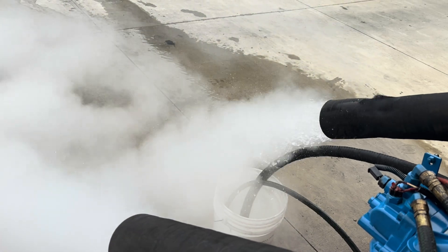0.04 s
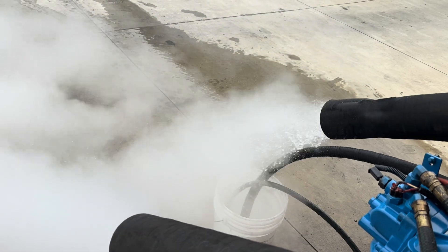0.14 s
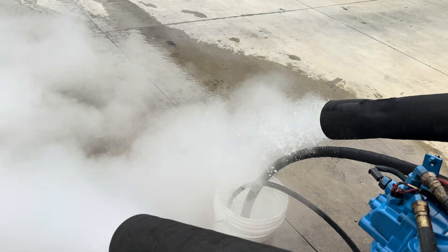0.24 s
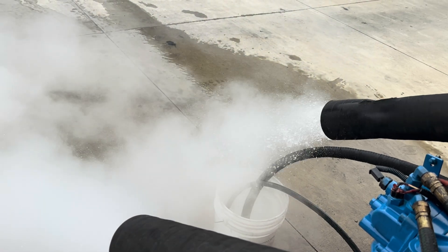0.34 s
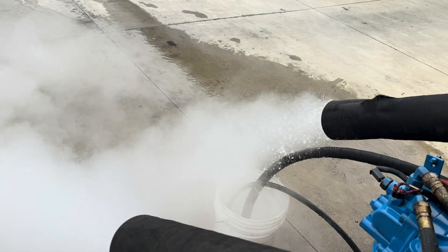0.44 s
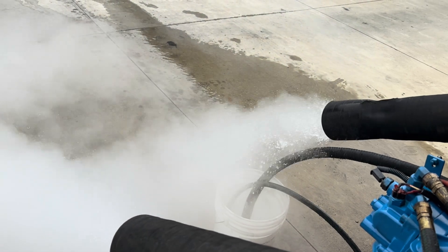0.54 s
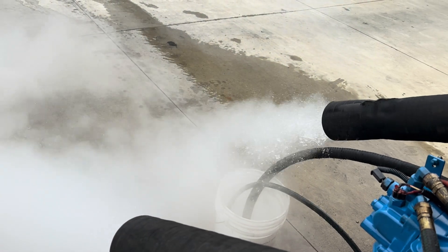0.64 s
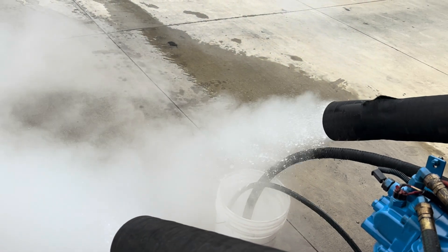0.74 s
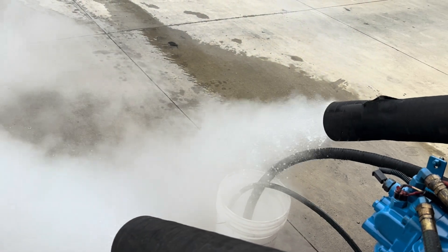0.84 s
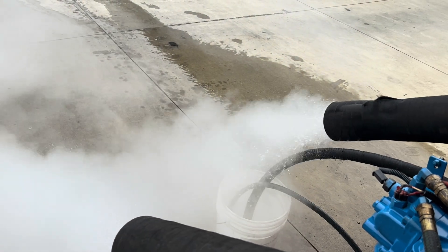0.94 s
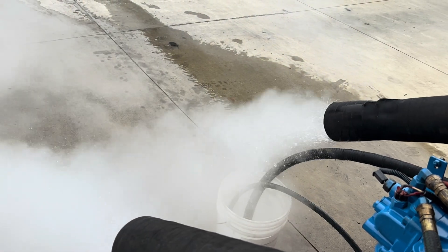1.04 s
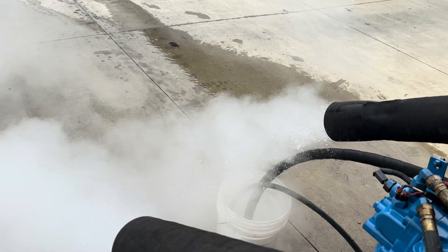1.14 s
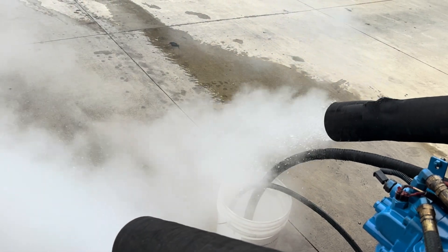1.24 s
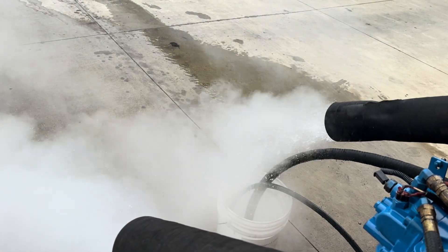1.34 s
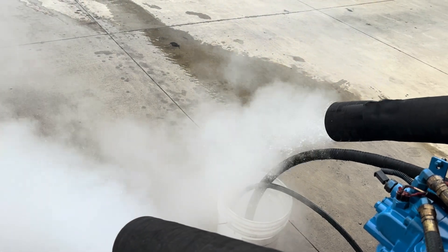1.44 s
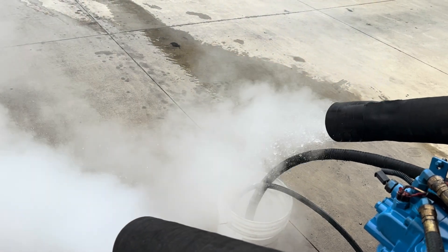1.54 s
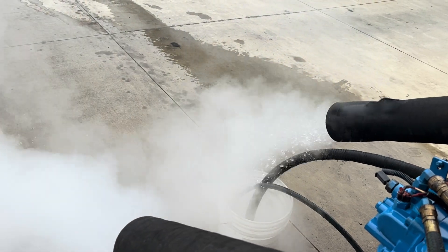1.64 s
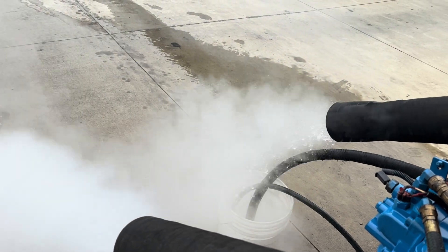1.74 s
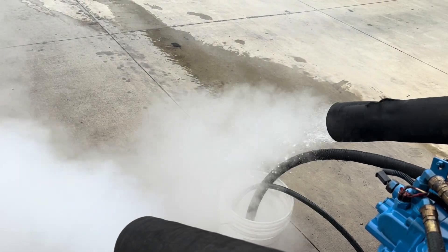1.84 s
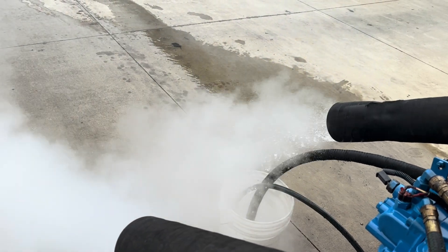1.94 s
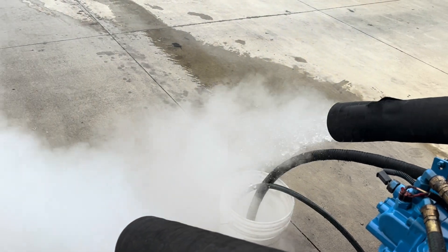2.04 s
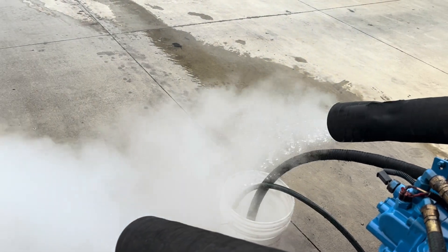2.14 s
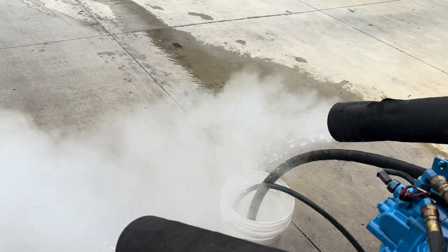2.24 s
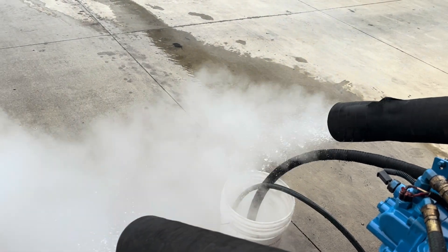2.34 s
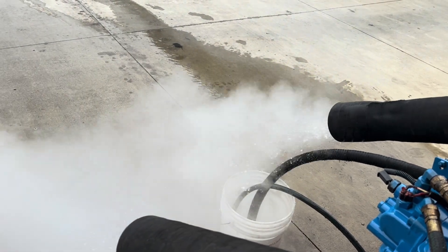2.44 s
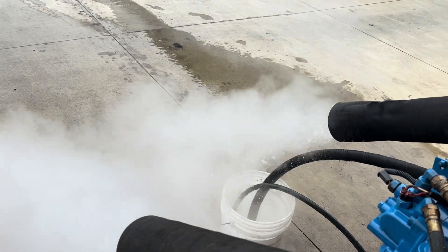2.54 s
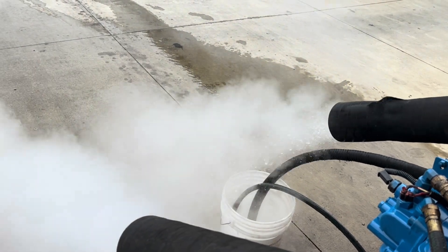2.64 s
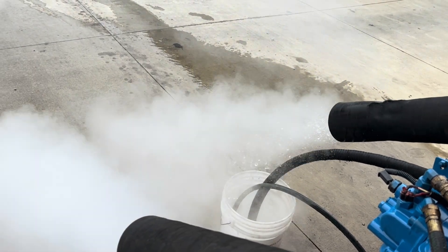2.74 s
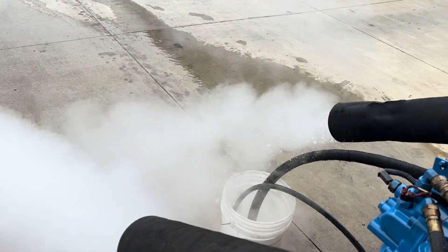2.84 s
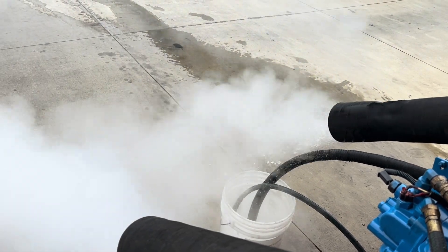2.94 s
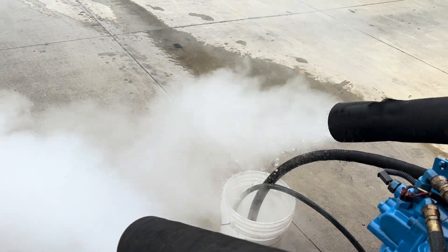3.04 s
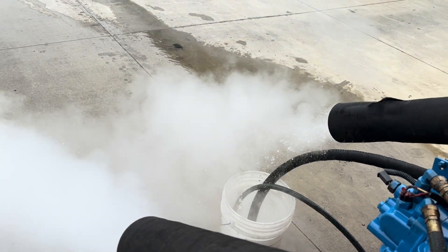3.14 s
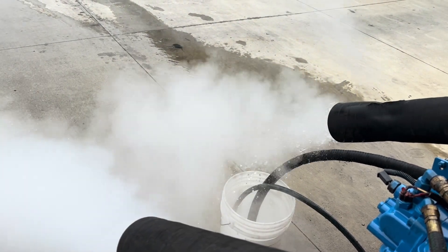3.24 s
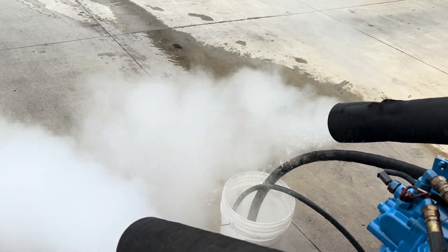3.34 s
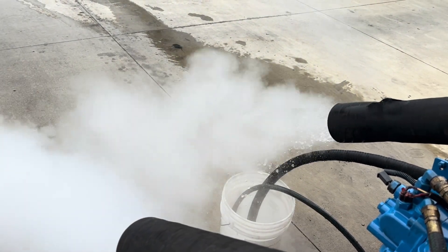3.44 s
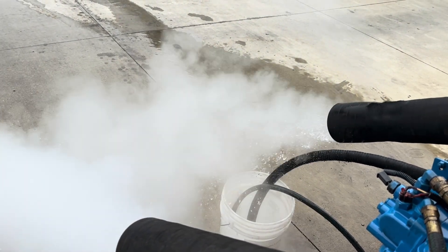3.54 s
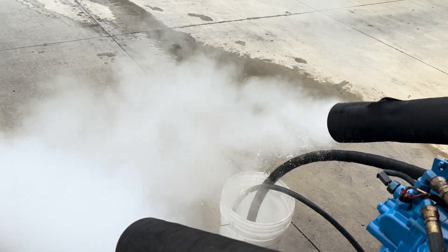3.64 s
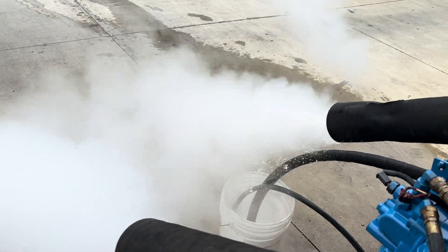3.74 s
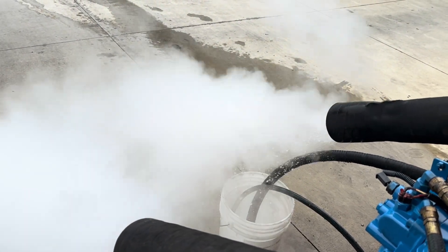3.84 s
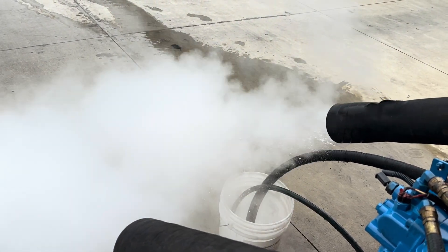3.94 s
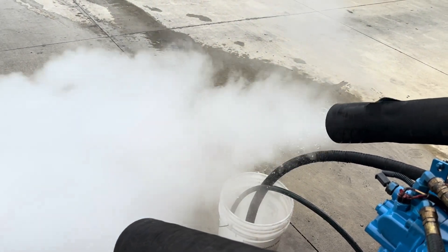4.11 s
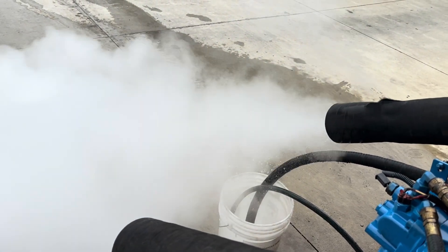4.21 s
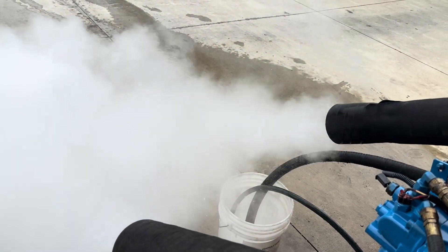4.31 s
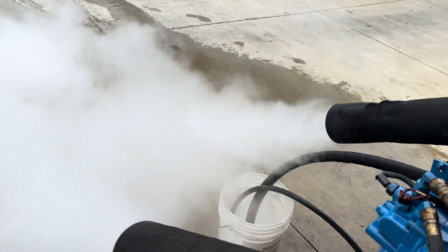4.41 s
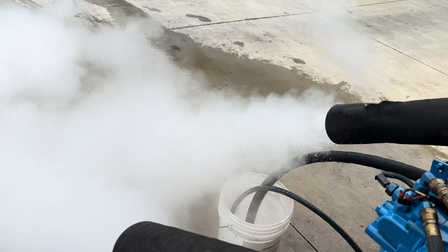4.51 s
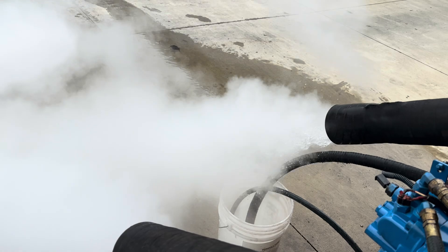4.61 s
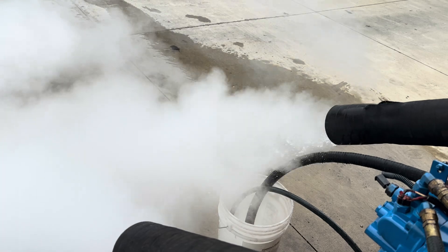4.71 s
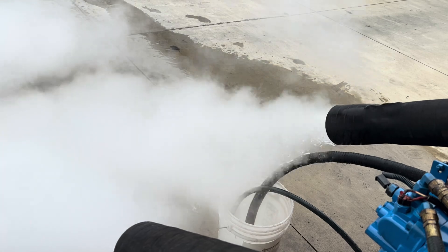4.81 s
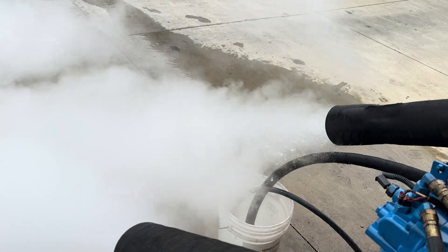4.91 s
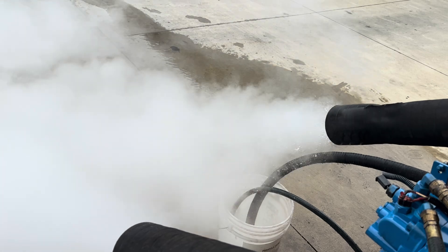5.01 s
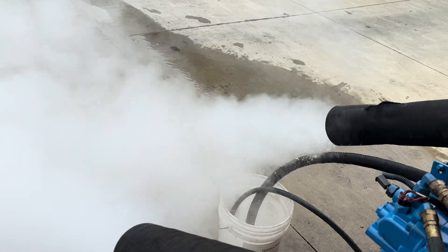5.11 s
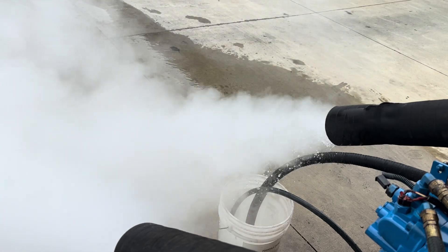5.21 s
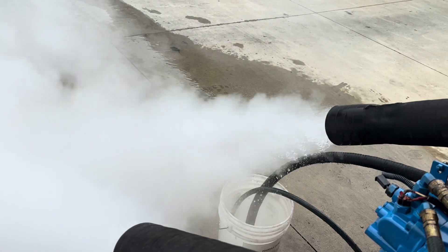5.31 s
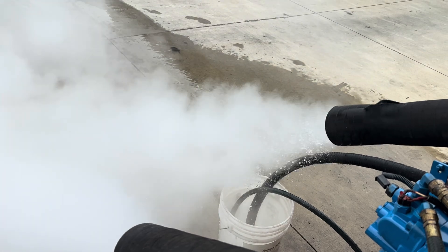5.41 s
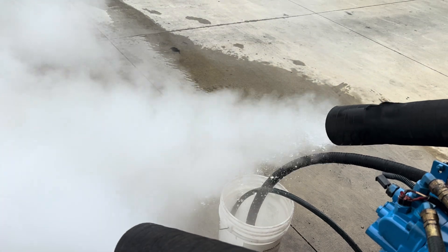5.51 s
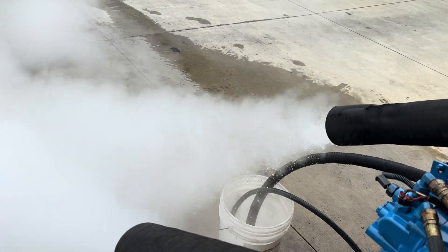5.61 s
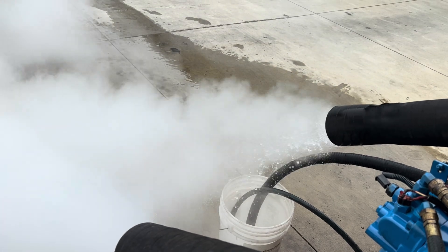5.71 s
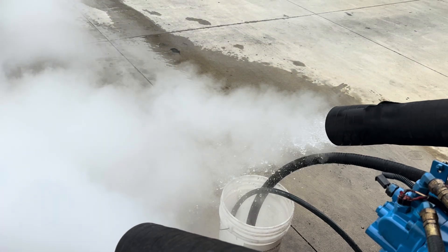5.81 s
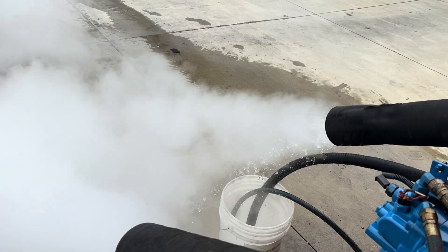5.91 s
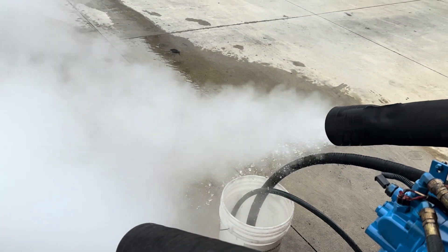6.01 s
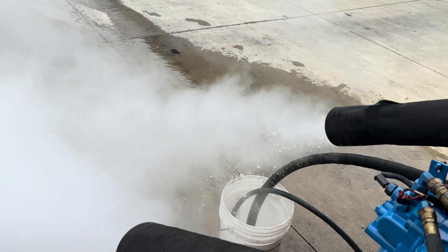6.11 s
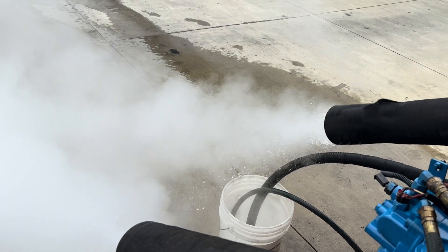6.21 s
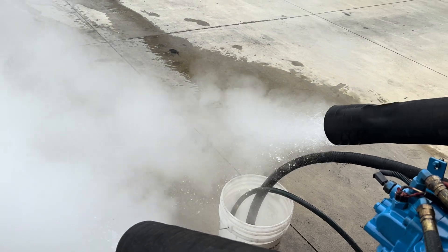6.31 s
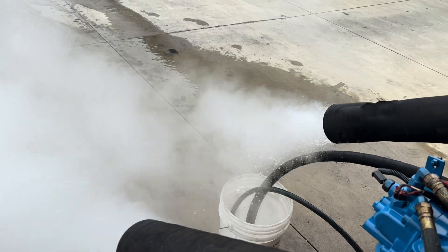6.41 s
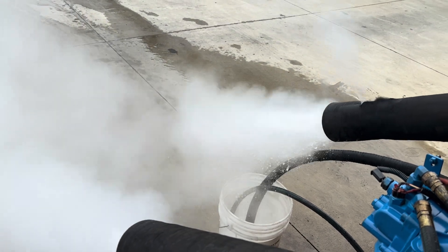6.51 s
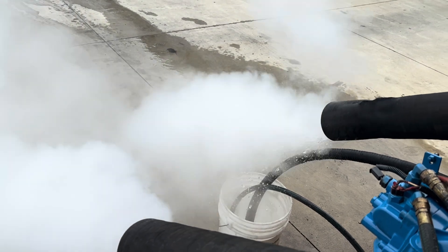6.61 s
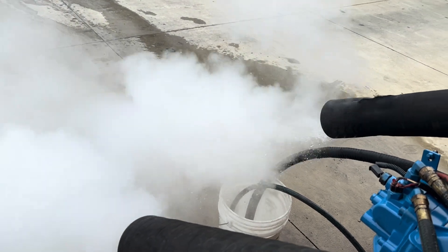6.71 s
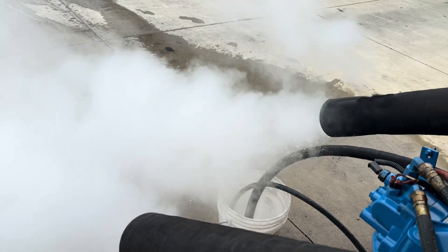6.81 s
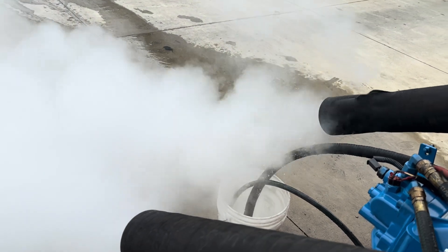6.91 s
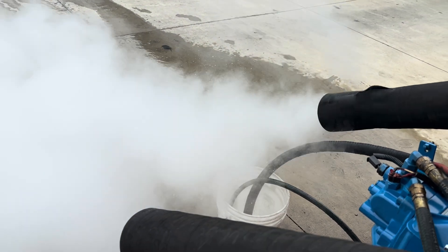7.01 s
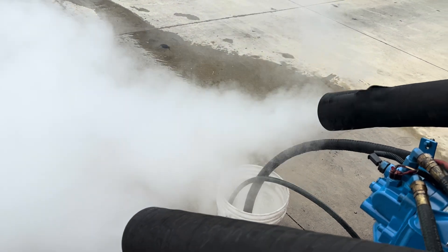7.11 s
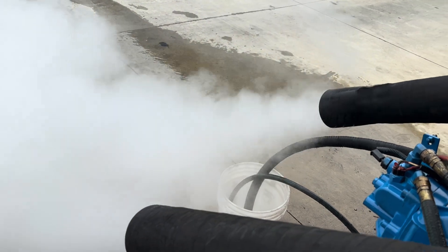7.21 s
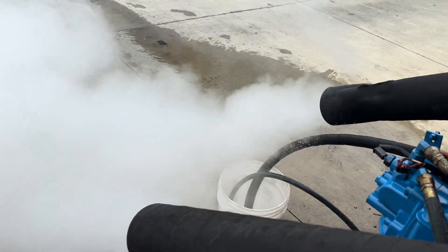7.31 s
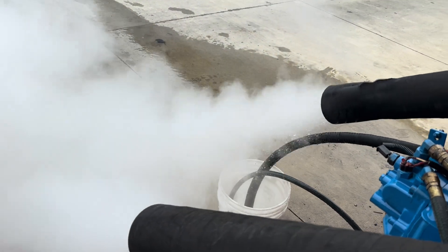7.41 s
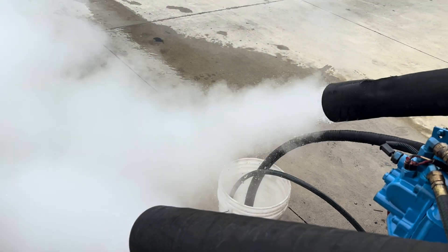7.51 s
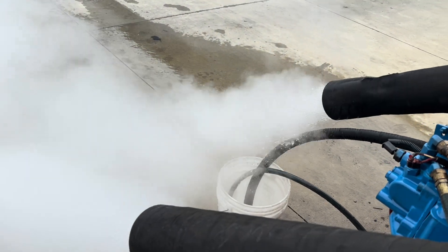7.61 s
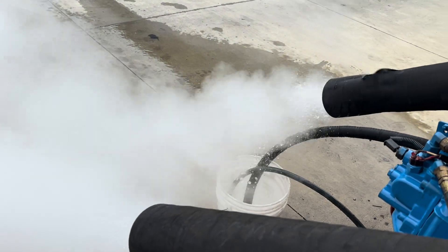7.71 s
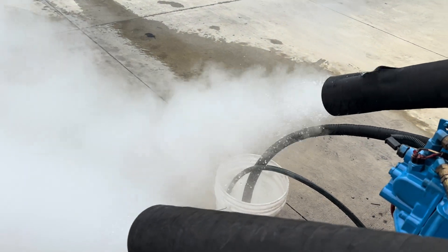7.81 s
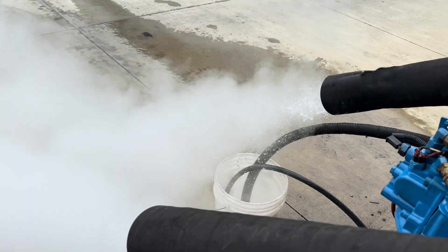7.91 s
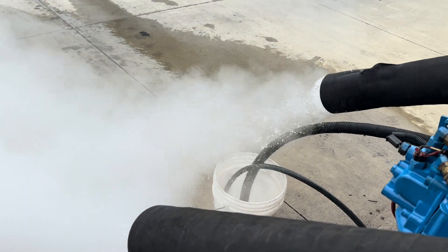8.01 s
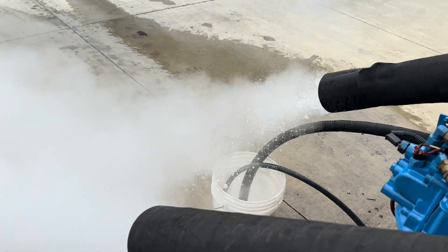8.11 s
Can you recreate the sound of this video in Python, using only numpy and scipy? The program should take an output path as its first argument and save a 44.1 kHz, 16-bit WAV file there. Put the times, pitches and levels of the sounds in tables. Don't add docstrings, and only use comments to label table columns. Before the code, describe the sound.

A marine V8 on an outdoor stand burbles through two open wet exhaust hoses, settling from fast idle to a steady lope. Two quick throttle blips bark with bursts of gas and spray, a raised speed is held for about a second, then it drops, blips once more, highest, and runs down lumpily. Water hisses and crackles throughout. Close stereo microphone at the hose ends, dry and open.

```python
import sys
import numpy as np
from scipy import signal
from scipy.fft import rfft, irfft, next_fast_len
from scipy.io import wavfile
from scipy.ndimage import uniform_filter1d

SR = 44100
rng = np.random.default_rng(int(sys.argv[2]) if len(sys.argv) > 2 else 0)


def voltage_ratio(level):
    return 10 ** (np.asarray(level, float) / 20)


def master_out(mix):
    frames = np.transpose(np.atleast_2d(mix))
    ceiling = np.clip(frames, -1, 1)
    pcm = np.round(ceiling * 32767).astype(np.int16)
    wavfile.write(sys.argv[1], SR, pcm)


N = 359408
STEP = 8

# time in seconds, engine cycles per second in Hz.
CRANK_SPEED = [(0, 25.44), (.45, 21.65), (1.05, 19.15), (1.5, 18.05), (1.85, 18.1), (2.25, 18.9),
               (2.8, 19.33), (3.617, 18.8), (3.89, 36.5), (4.33, 27.3), (4.64, 37.2), (5.06, 31.2),
               (5.98, 30.75), (6.42, 22.0), (6.73, 42.6), (7.3, 28.8), (7.72, 20.9), (8.15, 15.6)]
FLYWHEEL_S = 0.12
# start in seconds, travel in seconds,
# new position (0 shut, 1 light, 2 held, 3 open).
LEVER = [
    (.3, .8, 1),
    (3.59, .12, 3),
    (3.985, .03, 0),
    (4.29, .06, 3),
    (4.785, .03, 0),
    (5.0, .12, 2),
    (5.99, .04, 0),
    (6.385, .05, 3),
    (6.815, .03, 0),
]
CLOSING_SHARES = [.55, .1, .35, 0]
USUAL_HZ = [27, 19, 31, 31]
# peak in seconds, rise in seconds, fall in seconds, level in dB.
SURGES = [
    (0.0, .05, 0.061, 5.5),
    (3.76, 0.23, 0.18, 15),
    (4.47, .12, .16, 9),
    (6.61, 0.22, 0.2, 15.5),
]

# level in dB at the usual speed and dB per Hz of speed
EXHAUST_LAW = [-44.5, -41, -39, -37], [0.72, .1, 0.23, 0.54], 0.17
RUSH_LAW = [-41, -44.5, -41, -36.5], [0.83, .1, 1, 0.19], 0.94
SPRAY_LAW = [-49, -53.5, -48.5, -45.5], [0.72, .1, 1, 0.21], 0.65

# level in dB with throttle shut, light, held, open.
ORDER_DB = [(-7.5, -11, -9.0, -6.5), (12.5, 1, 6, 0.5), (-2, -6.5, -14, -5.5), (5.5, 2.5, 1.5, 5.5),
            (6.5, -2, 7, 0), (-3.5, -15, -2, -13.5), (7, 15, 6.0, 5.5), (4.5, 0.5, -1, 0),
            (-2, 2, -6.5, 5.0), (7, -4.5, 3.5, 3.5), (1, -4.5, 0.5, -9), (5, 1, -5, 3.0),
            (3, -4.5, 3, -0.5), (1, -4, -14, -5.5), (5, 3.5, -5.0, 4.0), (2.0, -8, 5.5, -3),
            (1.5, 2.0, -0.5, -9.5), (5.5, 4, 9.5, 2.5), (3.5, -7.5, 3, 6), (-4.5, 4, 3.5, 0.5),
            (4, -2.5, 0, -9), (-6.5, -5.0, -2, 12), (-2, -5.5, 8, -7.5), (7.5, -1, 12, 3.0),
            (-1.5, -8.5, 14, 3), (-4, -9.5, -6.0, -1), (4.5, 3, 10, -3), (-1.5, 0.5, -8, 14),
            (-8, 0.5, 2, 7), (-14, -1, 4, 3)]
UPPER_ORDER_DB = [3, -1.5, 8, 6]
LEANING_ORDERS = [2, 3, 5, 6, 8, 10]
# dB per Hz of speed with throttle shut, light, held, open.
ORDER_LEAN = [(-0.3, -5, .1, .6), (-0.26, 0, 0.89, -0.93), (-0.44, -2, 1, 0.2), (-0.51, 6, -0.87, .3),
              (0.15, -0.5, 0.64, -1.34), (0.1, -1.3, -0.21, 0.36)]
LEAN_LIMIT_DB = 13
NEAR_BANK = [0, 3, 5, 6]
GAP_TURN = 0.27
BOOM_S, BOOM_LENGTH_S, BOOM_DB, BOOM_DULLS_DB = 4.79, 0.3, 18, -4
EVEN_PULL_DB, FULL_PULL_HZ_PER_S = 3.5, 30

# frequency in Hz, level in dB.
HOSE_LOW = [(35, -17), (60, 12), (80, 7.5), (105, 7.5), (135, 7), (165, 12.5), (195, 10), (230, 6.5),
            (265, 8.5), (300, 4.5), (340, 6), (380, -2.5), (420, 0), (460, 1)]
HOSE_MID = [(500, 7), (540, 0.6), (590, -4), (630, -11), (680, -2), (720, -9.5), (770, -20.5), (830, -25.5),
            (900, -14.5), (980, -20), (1080, -18), (1200, -25), (1400, -55)]
HOSE_ROLLOFF = [(1700, -30.5), (2100, -34), (2500, -40)]
# start in seconds, peak in dB, start pitch in Hz, end pitch in Hz, length in seconds.
THUMPS = [
    (3.98, -12, 145, 41.7, 0.039),
    (4.301, -19.5, 87, 59.3, 0.053),
    (6.805, -16, 193, 45.8, .065),
    (8.104, -24, 339, 204, 0.044),
]

# frequency in Hz, level in dB per Hz.
RUSH_COLOUR = [(300, -3), (550, 1), (800, -9), (1400, -5.5), (2300, -13), (3500, -18.5), (6000, -56.5)]
# frequency in Hz, width in Hz, level in dB.
GURGLES = [(873, 64, 11), (1216, 12, -11.5), (1414, 15, 8.5), (1610, 13, -4.5), (2225, 21, 4.5),
           (2894, 170, 5.5)]
# frequency in Hz, level in dB per Hz.
SPRAY_COLOUR = [(1500, -9.5), (2500, -18.5), (4000, 3.5), (5600, 2.5), (8800, -1.5), (11200, -5.5),
                (13000, -4), (14600, -34), (15100, -32), (15500, -33.5)]
FINE_MIST_DB = [1, -4, -8, -4]
CRACKLE, CRACKLE_PER_DB = 0.15, 0.05
# frequency in Hz, level in dB.
RUMBLE_COLOUR = [(35, -30), (70, 0), (150, 2), (300, 0), (550, -2), (750, -10), (1100, -30)]
# frequency in Hz, width in Hz, level in dB.
WHISTLES = [(6340, 110, -13), (6730, 55, -18), (8600, 74, -28)]

# frequency in Hz, side minus mid in dB.
WIDTH = [(60, -15.5), (110, -11), (200, -19.5), (380, -8.5), (700, -5.5), (1290, -3.5), (2380, -4),
         (4400, -1), (7200, -3.5), (9000, 0), (11500, 2.5), (15000, 0)]
# frequency in Hz, share of the side in step with the mid.
LEFT_LEAN = [(60, 0.66), (200, 0.17), (700, 0.5), (1300, 0.28), (2400, 0.41), (4400, 0.76), (8000, .1),
             (15000, .05)]
# frequency in Hz, level in dB.
SUM_BAND = [(9000, 0), (9350, -6), (9600, -45), (10750, -45), (10950, 0), (15000, 0), (15500, -14),
            (15700, -50)]
DIFFERENCE_BAND = [(12000, 0), (12500, -40), (14700, -40), (15000, 0), (15650, 0), (15800, -50)]


def rms_one(x):
    return x / np.sqrt(np.mean(x ** 2) + 1e-20)


def in_time(rows, every=1):
    s, *columns = np.transpose(rows)
    t = np.arange(0, N, every) / SR
    return [np.interp(t, s, column) for column in columns]


def at_hz(points, hz):
    table = np.array(points)
    return np.interp(np.log(hz + 1e-9), np.log(table[:, 0]), table[:, 1])


def drift(rate_hz, size):
    r = np.exp(-80 * np.pi * rate_hz / SR)
    noise = rng.standard_normal(N // 40 + 2002)
    slow = signal.lfilter([1], [1, -2 * r, r * r], noise)[2000:]
    return np.interp(np.linspace(0, N / 40, size), np.arange(len(slow)), rms_one(slow))


def shaped(x, spectrum):
    size = next_fast_len(N)
    gain = voltage_ratio(at_hz(spectrum, np.fft.rfftfreq(size, 1 / SR)))
    return rms_one(irfft(rfft(x, size) * gain, size)[..., :N])


def resonate(x, hz, width):
    r = np.exp(-np.pi * width / SR)
    return signal.lfilter([1 - r, 0, r - 1], [1, -2 * r * np.cos(2 * np.pi * hz / SR), r * r], x)


def speed():
    return uniform_filter1d(in_time(CRANK_SPEED)[0], int(FLYWHEEL_S * SR), mode="nearest")


def engine(every=1):
    cycle_hz = speed()
    corners, was = [(0, *CLOSING_SHARES)], CLOSING_SHARES
    for s, travel, position in LEVER:
        new = np.eye(4)[position]
        corners = corners + [(s, *was), (s + travel, *new)]
        was = new
    throttle = np.array(in_time(corners, every=every))
    t = np.arange(0, N, every) / SR
    surge_db = 0
    for s, rise, fall, db in SURGES:
        away = (t - s) / np.where(t < s, rise, fall)
        surge_db = surge_db + db * np.maximum(1 - away ** 2, 0)
    return cycle_hz[::every], throttle, surge_db


def loudness(law, every=1):
    cycle_hz, throttle, surge_db = engine(every=every)
    usual_db, per_hz, share = law
    speed_db = (per_hz * (cycle_hz[:, None] - USUAL_HZ) * throttle.T).sum(axis=1)
    return usual_db @ throttle + speed_db + share * surge_db


def puffs(sharp, far, vary_db):
    slot = np.cumsum(speed()) * 8 / SR
    number = slot.astype(int)
    size = voltage_ratio(vary_db * rng.standard_normal(4000))[number]
    bank = np.where(np.isin(number % 8, NEAR_BANK), 1, far)
    return rms_one(bank * size * np.exp(-sharp * (slot - number)))


def whistles(level_db, from_hz):
    fast = np.clip((speed() - from_hz) / 4, 0, 1)
    noise = rng.standard_normal((2, N))
    song = 0
    for hz, width, db in WHISTLES:
        narrow = resonate(resonate(noise, hz, width), hz, width)
        song = song + voltage_ratio(db) * rms_one(narrow)
    return voltage_ratio(level_db) * fast * song


def rumble(above_db):
    noise = rng.standard_normal((2, N)) * puffs(sharp=1.0, far=0.75, vary_db=0.5)
    level_db = loudness(EXHAUST_LAW) + above_db + 1.5 * drift(5.8, size=N)
    return voltage_ratio(level_db) * shaped(noise, RUMBLE_COLOUR)


def spray(level_db, drops_per_s, grain_db, steady):
    flow = steady + (1 - steady) * puffs(sharp=0.33, far=1.0, vary_db=4.0)
    _, throttle, surge_db = engine()
    sizes = voltage_ratio(grain_db * np.minimum(rng.exponential(1, (2, N)), 5))
    signs = rng.choice([-1, 1], (2, N))
    drops = sizes * signs * (rng.random((2, N)) < drops_per_s / SR)
    hiss = rng.standard_normal((2, N)) + (CRACKLE + CRACKLE_PER_DB * surge_db) * rms_one(drops)
    mist = shaped(hiss * flow, SPRAY_COLOUR)
    fine = signal.sosfiltfilt(signal.butter(4, 10000, "high", fs=SR, output="sos"), mist)
    fine_gain = voltage_ratio(FINE_MIST_DB @ throttle)
    return voltage_ratio(level_db + 1.0 * drift(15, size=N)) * (mist + (fine_gain - 1) * fine)


def gas_rush(level_db, steady, patchy_db, gurgle_db):
    flow = steady + (1 - steady) * puffs(sharp=1.25, far=0.81, vary_db=2.5)
    noise = rng.standard_normal((2, N)) * flow * voltage_ratio(patchy_db * drift(18, size=N))
    rings = 0
    for k, (hz, width, db) in enumerate(GURGLES):
        gain = voltage_ratio(db + 1.74 * drift(9.1, size=N))
        rings = rings + (-1) ** k * gain * resonate(noise, hz, width)
    return voltage_ratio(level_db) * (voltage_ratio(4.0) * shaped(noise, RUSH_COLOUR) + voltage_ratio(gurgle_db) * rms_one(rings))


def thumps():
    out, t = np.zeros(N), np.arange(N) / SR
    for s, db, start_hz, end_hz, length in THUMPS:
        u = np.clip((t - s) / length, 0, 1)
        cycles = length * (start_hz * u + (end_hz - start_hz) * u * u / 2)
        out += voltage_ratio(db) * np.sin(np.pi * u) * np.sin(2 * np.pi * cycles)
    return out


def misfire(size):
    u = (np.arange(size) * STEP / SR - BOOM_S) / BOOM_LENGTH_S
    return np.clip(12 * u, 0, 1) * np.clip(2.5 * (1 - u), 0, 1)


def low_order_trims(cycle_hz, throttle):
    off_hz = (cycle_hz - np.c_[USUAL_HZ]) * throttle
    boom = misfire(len(cycle_hz))
    trim = {}
    for k, lean in zip(LEANING_ORDERS, ORDER_LEAN):
        trim[k] = np.clip(lean @ off_hz, -LEAN_LIMIT_DB, LEAN_LIMIT_DB)
    for k in [2, 3, 5, 8]:
        trim[k] = trim[k] + (BOOM_DB if k == 2 else BOOM_DULLS_DB) * boom
    pull_hz_per_s = np.gradient(cycle_hz) * SR / STEP
    trim[8] = trim[8] + EVEN_PULL_DB * np.clip(pull_hz_per_s / FULL_PULL_HZ_PER_S, 0, 1)
    return trim


def exhaust_orders(flutter_db, slip, scatter_db, spread):
    cycle_hz, throttle, _ = engine(every=STEP)
    size = len(cycle_hz)
    level_db = loudness(EXHAUST_LAW, every=STEP)
    trim = low_order_trims(cycle_hz, throttle)
    turn = 2 * np.pi * (np.cumsum(cycle_hz) * STEP / SR - GAP_TURN)
    light = throttle[1]
    hose = list(HOSE_LOW) + list(HOSE_MID) + list(HOSE_ROLLOFF)
    upper = list(scatter_db * rng.standard_normal((49, 4)) + UPPER_ORDER_DB)
    slow_and_shut = throttle[0] * np.clip((27 - cycle_hz) / 6, 0, 1)
    lumpy = 1 + 2.5 * misfire(size) + 2.5 * slow_and_shut
    strength = np.array([0.56, 0.66, 0.83, 0.4])
    out = 0
    for k, by_throttle in enumerate(list(ORDER_DB) + upper, start=2):
        firing = np.exp(-2j * np.pi * k * np.array(NEAR_BANK) / 8)
        bank = np.angle(strength @ firing) + 2.2 * np.log2(k / 18)
        lope = np.pi * (k % 8 > 0) + 0.5 * np.sign((k + 4) % 8 - 4)
        wet = np.sqrt(k / 8)
        db = level_db + by_throttle @ throttle + at_hz(hose, k * cycle_hz) + trim.get(k, 0)
        db = db + flutter_db * (wet + lumpy) * drift(5.25, size=size)
        db = db - (lumpy - 1) * max(wet - 1.6, 0) * 2.7
        db = db - 99 * (k * cycle_hz > 2500)
        smear = -0.37 * max(k - 10, 0) ** 2
        offset = spread * wet * rng.standard_normal()
        wander = slip * lumpy * drift(8.1, size=size)
        phase = smear + light * lope + (1 - light) * bank + wet * (offset + wander)
        out = out + voltage_ratio(db) * np.cos(k * turn + phase)
    return np.sqrt(2) * signal.resample_poly(out, STEP, 1)[:N]


def microphones(tone, noise):
    size = next_fast_len(N)
    hz = np.fft.rfftfreq(size, 1 / SR)
    lean = np.clip(at_hz(LEFT_LEAN, hz), -1, 1)
    tone_f = rfft(tone, size)
    noise_mid_f, noise_side_f = rfft(noise, size)
    mid_f = tone_f + noise_mid_f
    apart_f = 1j * tone_f + noise_side_f
    side_f = lean * mid_f + np.sqrt(1 - lean ** 2) * apart_f
    side_gain = voltage_ratio(at_hz(WIDTH, hz) + at_hz(DIFFERENCE_BAND, hz))
    side = irfft(side_gain * side_f, size)[:N]
    mid = irfft(voltage_ratio(at_hz(SUM_BAND, hz)) * mid_f, size)[:N]
    return mid + side * [[1], [-1]]


def scene():
    rush_db, spray_db = loudness(RUSH_LAW), loudness(SPRAY_LAW)
    noise = whistles(spray_db, from_hz=20.7)
    noise = noise + rumble(above_db=0.0)
    noise = noise + spray(spray_db, drops_per_s=500, grain_db=4.0, steady=0.75)
    noise = noise + gas_rush(rush_db, steady=0.29, patchy_db=0.0, gurgle_db=-5.5)
    tone = thumps() + exhaust_orders(flutter_db=0.7, slip=0.08, scatter_db=4.5, spread=0.2)
    return microphones(tone, noise)


def band_limit(x):
    return signal.sosfilt(signal.butter(12, 15620, fs=SR, output="sos"), x)


def record(dry):
    cut = signal.sosfilt(signal.butter(2, 38, "high", fs=SR, output="sos"), dry)
    mix = 1.15 * np.tanh(cut / 1.373)
    return band_limit(mix)


dry = scene()
out = record(dry)
master_out(out)
```